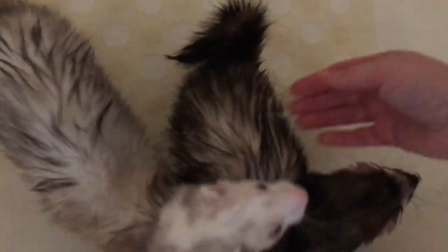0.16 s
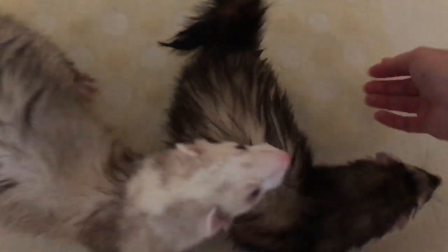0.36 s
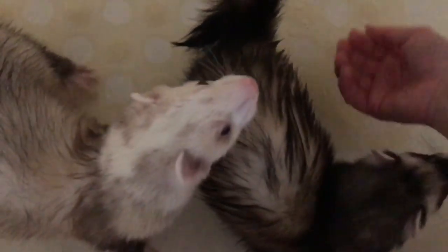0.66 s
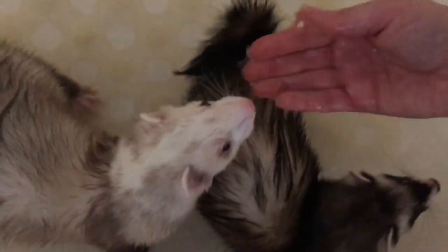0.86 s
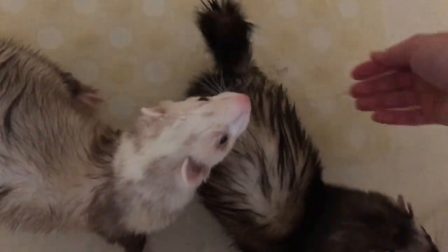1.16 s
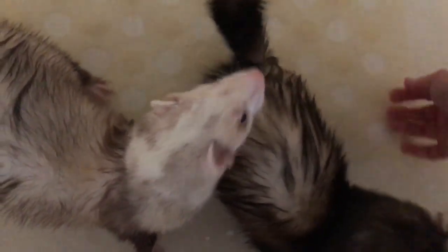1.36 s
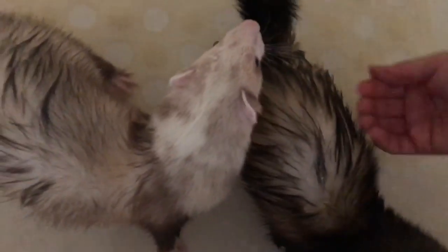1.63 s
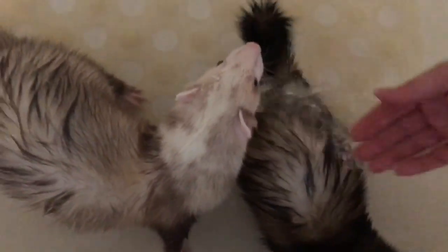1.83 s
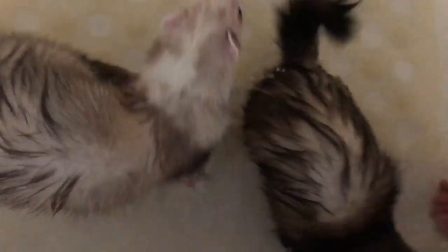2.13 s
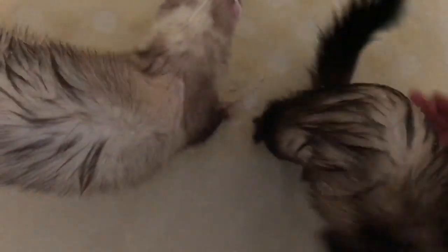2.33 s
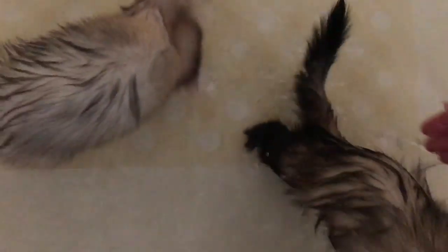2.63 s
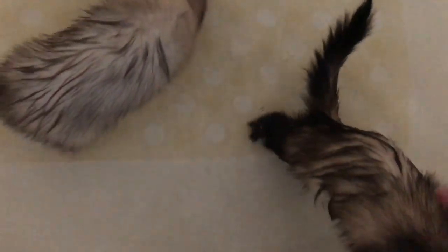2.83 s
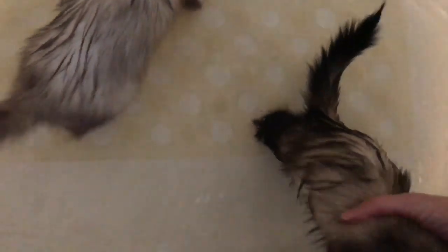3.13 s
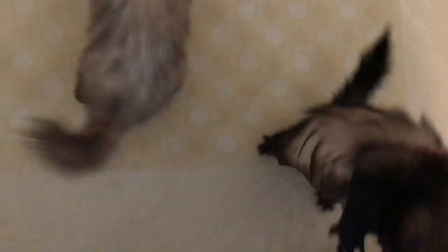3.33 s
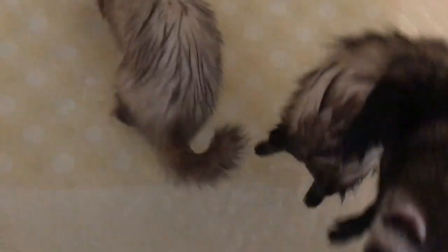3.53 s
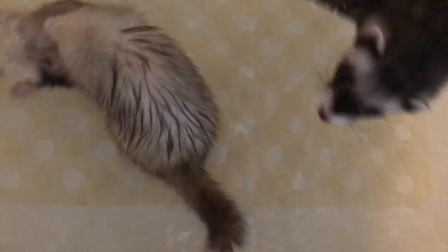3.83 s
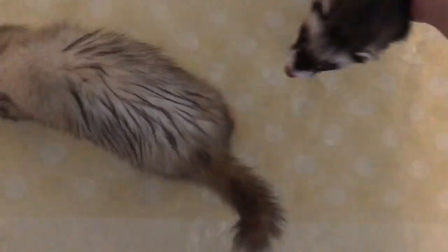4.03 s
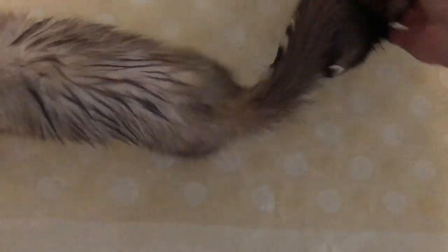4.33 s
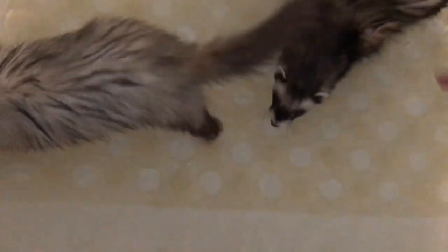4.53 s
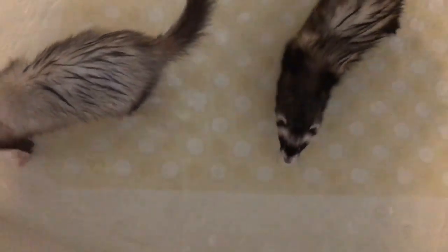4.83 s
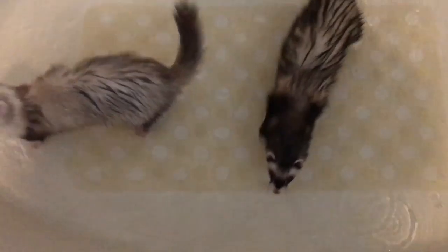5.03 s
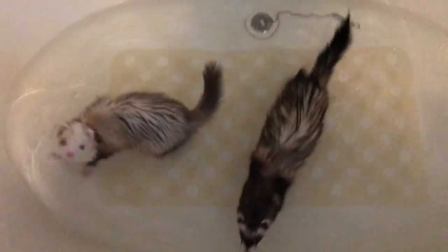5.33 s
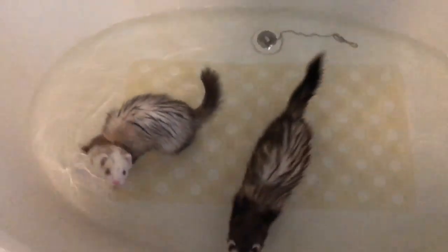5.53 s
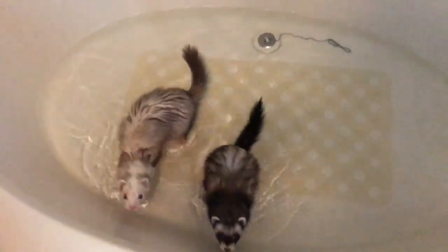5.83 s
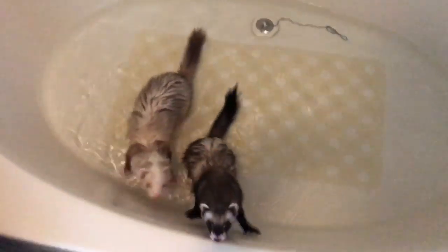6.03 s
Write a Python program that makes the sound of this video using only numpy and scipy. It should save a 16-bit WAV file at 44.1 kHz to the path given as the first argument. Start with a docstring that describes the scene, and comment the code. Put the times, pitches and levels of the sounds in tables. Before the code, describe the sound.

Two ferrets wade in shallow bathwater, with scattered plinks, small splashes and drips echoing in a tub over a faint low hum.

```python
"""Shallow bathwater splashes as two ferrets wade in it and a hand scoops water over them.
Trapped air bubbles ring at a climbing pitch, drops click on the surface and paws open gulping cavities;
each sweep stirs up a cloud of small bubbles and spray, air pockets squelch and bumps make the tub boom.
The tub adds a dense blur of echoes and its resonances, the small bathroom rings briefly,
and a low hum, rumble and faint hiss lie underneath."""
import sys
import numpy as np
from scipy import signal
from scipy.fft import rfft, irfft, next_fast_len
from scipy.io import wavfile
from scipy.ndimage import uniform_filter1d

SR = 44100
rng = np.random.default_rng(int(sys.argv[2]) if len(sys.argv) > 2 else 0)


def to_wav(sig):
    """Store sig (one row per channel, or 1-D mono) as 16-bit WAV at the path in sys.argv[1].

    Samples outside -1..1 are clipped; the rate is SR.
    """
    pcm = np.clip(np.atleast_2d(sig), -1, 1) * 32767
    pcm = np.round(pcm).astype(np.int16)
    wavfile.write(sys.argv[1], SR, pcm.T)  # frames by channels


N = 272097
TIME = np.arange(N) / SR

# Levels in these tables are relative: the source functions add their own trims.
# larger bubbles that stand out of the splashing: start_s, pitch_hz, level_db
BUBBLES = [(.045, 2180, -32.5), (.164, 4200, -34.5), (.2093, 1924, -28), (.2255, 3180, -26),
           (.227, 743, -24), (.6124, 3570, -34.5), (.7567, 5200, -28.5), (0.7928, 5540, -33.5),
           (.9083, 2180, -34), (1.0298, 1806, -30), (1.091, 2340, -36), (1.321, 5140, -36),
           (1.725, 2815, -27.5), (1.9895, 2140, -25), (2.003, 1590, -23), (2.0549, 2256, -28.5),
           (2.1365, 977, -29.5), (2.2282, 1012, -25.5), (2.3667, 3640, -29.5), (2.6535, 1200, -33),
           (2.8336, 1617, -30), (2.8447, 850, -30.5), (3.2048, 1090, -36), (3.3488, 1990, -28),
           (3.3768, 3710, -25.5), (3.405, 3050, -31.5), (3.5583, 1630, -36), (3.6381, 1080, -32),
           (3.646, 763, -37), (3.9712, 2870, -22), (4.0641, 2200, -23), (4.2152, 2350, -23.5),
           (4.2158, 905, -23.5), (4.2942, 4250, -27.5), (4.4305, 2035, -32.5), (4.4823, 3720, -33.5),
           (4.501, 1238, -24.5), (4.6523, 1070, -25.5), (4.8056, 4230, -16.5), (4.852, 932, -36.5),
           (5.1011, 816, -34.5), (5.128, 1030, -34.5), (5.4012, 977, -34), (5.482, 761, -24),
           (5.62, 2700, -19.5), (5.6246, 860, -32.5), (5.732, 1655, -20.5), (5.745, 1670, -23.5),
           (5.81, 1424, -23), (5.815, 582, -28.5), (5.9219, 777, -25), (6.1297, 1282, -36)]
# hardest drops on the surface: start_s, level_db, centre_hz, crack_level_db
DROPLETS = [(.003, -21, 6460, -26), (0.0178, -27.5, 8400, -34), (.0993, -36.5, 10700, -31),
            (.2, -30, 6100, -34), (0.225, -30.5, 6340, -32), (0.329, -34.5, 9400, -48),
            (0.3532, -33.5, 8840, -37), (0.473, -28, 3330, -34), (0.482, -26, 6440, -45),
            (.5803, -32.5, 7750, -29), (.612, -35, 4500, -40), (0.7385, -35, 4000, -45),
            (0.909, -38, 3080, -29.5), (1.03, -31.5, 9200, -49), (1.078, -25.5, 11200, -30),
            (1.1017, -30, 10960, -32), (1.1544, -43, 5400, -29), (1.3207, -32, 5470, -36),
            (1.725, -26, 7400, -43), (1.9134, -27, 4600, -34), (2.0103, -9, 3020, -26),
            (2.021, -19.5, 8300, -42), (2.041, -30, 6750, -45), (2.3423, -30, 4100, -37),
            (2.4673, -30.5, 5060, -32), (2.547, -28.5, 1800, -37), (2.5902, -23.5, 3920, -32),
            (2.7672, -26, 2620, -48), (3.114, -32.5, 5640, -34), (3.34, -26.5, 1700, -58),
            (3.3754, -25, 5500, -42), (3.387, -28.5, 5500, -50), (3.887, -22.5, 6040, -34),
            (4.052, -18, 2920, -13), (4.2152, -21.5, 4380, -49), (4.2936, -23, 5100, -30),
            (4.3086, -34, 4830, -32), (4.4161, -22, 5460, -48), (4.4173, -24, 2700, -48),
            (4.5, -27, 3440, -50), (4.5402, -36.5, 8760, -37), (4.64, -19, 2130, -43),
            (4.649, -18.5, 5100, -19), (4.8055, -30, 4730, -35), (5.478, -20.5, 2060, -45),
            (5.4812, -22.5, 7800, -22), (5.5862, -24, 3620, -31.5), (5.787, -30, 4530, -57),
            (5.8154, -15.5, 10200, -42), (6.096, -26.5, 10100, -42)]
# a paw or hand opens a cavity in the water: start_s, level_db, cavity_pitch_hz, spray_level_db
PLUNGES = [(.226, -30.5, 640, -60), (2.008, -18, 776, -47), (2.137, -27.5, 880, -51.5),
           (2.227, -27, 1180, -44.5), (2.547, -26.5, 1520, -47.5), (2.767, -27.5, 1270, -52.5),
           (2.845, -27, 860, -56), (3.205, -30, 1080, -62), (3.389, -27, 514, -68),
           (3.972, -26.5, 910, -66), (4.061, -29.5, 1150, -62), (4.215, -29, 1000, -47.5),
           (4.644, -24.5, 980, -55), (5.098, -31.5, 660, -73), (5.481, -25.5, 800, -59),
           (5.813, -19, 524, -47), (5.912, -24, 780, -49.5)]
# a body or hand sweeps through the water: start_s, length_s, churn_level_db, bubble_pitch_hz
SLOSHES = [(0, 0.12, -48.5, 2680), (0.148, 0.086, -44, 1510), (0.447, 0.089, -51.5, 2230),
           (0.714, 0.35, -61, 4000), (1.049, 0.15, -45, 3350), (1.598, 0.37, -57, 3050),
           (1.907, 0.33, -53, 3300), (2.315, 0.59, -53, 3200), (2.6, 0.13, -42, 2670),
           (3.113, 0.25, -59.5, 4000), (3.343, 0.067, -43, 1670), (3.516, .12, -45.5, 1170),
           (3.808, 0.26, -57, 2910), (3.93, 0.073, -40, 2080), (4.04, 0.16, -46.5, 2920),
           (4.386, 0.28, -53, 2580), (4.78, 0.16, -47, 2400), (5.35, 0.28, -46.5, 2160),
           (5.563, 0.39, -44.5, 1980), (5.958, .41, -48, 2920)]
# an air pocket squeezed shut sweeps upwards: start_s, length_s, from_hz, to_hz, level_db
SQUELCHES = [(1.104, .022, 2600, 3300, -39), (2.234, .029, 1250, 3050, -34)]
# bodies bump the tub: start_s, pitch_hz, level_db
BUMPS = [(2.012, 89.6, -36.5), (4.055, 90.4, -33), (4.295, 101.5, -43.5), (4.425, 101.4, -44.5)]
# colour of the spray: frequency_hz, gain_db
SPRAY_COLOUR = [(2000, 4), (3500, 2.5), (5500, 5.5), (7500, -5.5), (9000, 0), (10500, -5.5), (13000, 2),
                (16000, -3.5)]
# resonances of the tub and the air in it: frequency_hz, level_db, t60_s
TUB_MODES = [(233.8, 11, 0.46), (298.4, 14, 0.55), (443.5, 5, 0.84), (522, 10, 0.51), (694, 8, 0.42),
             (894, -2, 0.22), (1010, -12, 0.22)]
# ring of the bathroom: frequency_hz, level_db, t60_s
ROOM = [(101, -4, 0.51), (250, 0.5, 0.27), (620, -5, 0.53), (1210, -8.5, 0.44), (2640, -14, 0.56),
        (5230, -25, 0.76), (9000, -4, 0.27), (16000, -5.5, 0.1)]
# spectrum of the steady rumble: frequency_hz, level_db
RUMBLE = [(20, -34), (40, -3.5), (60, -4.5), (95, -1), (125, -22), (170, -13.5), (300, -62)]
# level of the rumble and its hum over time: time_s, level_db
DRONE = [(0, -48), (0.9, -51), (1.8, -54.5), (2.35, -46.5), (2.9, -50.5), (3.3, -52.5), (3.8, -56),
         (4.25, -47.5), (4.95, -59.5), (5.3, -51.5), (6.17, -59)]
# spectrum of the background hiss: frequency_hz, level_db
HISS = [(60, -1), (150, -4), (300, 1.5), (450, -8), (1000, -8.5), (2000, -15), (4000, -21), (8000, -26),
        (16000, -28)]
# level of the hiss over time: time_s, level_db
HISS_LEVEL = [(0, -59.5), (4.6, -58.5), (5.0, -54), (6.17, -52)]
# colour of the microphone: frequency_hz, gain_db
MICROPHONE = [(120, 0.5), (400, -1), (1000, -0.5), (3000, -.5), (4000, 0.5), (4900, -2.5), (6300, 0),
              (9500, -0.5), (15000, -2)]

HUM_HZ, HUM_DB = 58.7, -4  # the hum's level is relative to the rumble
TOP_HZ = 16100  # upper limit of the microphone
BUBBLE_CYCLES = 7.04  # a middling bubble's decay to 1/e, in cycles
RING_PER_DB, RING_PER_OCTAVE = -0.03, -0.013  # doublings of the decay: loud and tiny bubbles die sooner
CHURN_DB, CHURN_RATIO = -16, 1.45  # bubbles from a cavity: level and pitch relative to it
CHURN_LEAD_S, CHURN_S = 0.015, 0.092  # how far ahead of the plunge they start, and how long they last
THUMP_DB_PER_OCTAVE = -5.5  # smaller, higher cavities thump the tub floor less
# finer bubbles come with more spray; at this pitch spray and churn get the same level before trims
SPRAY_DB_PER_OCTAVE, SPRAY_EVEN_HZ = 9.5, 3270


def undb(db):
    """Decibels are logarithmic: convert them to an amplitude gain."""
    return 10 ** (np.asarray(db) / 20)


def unit(x):
    """Normalisation by effective value: scale to an rms of one."""
    return x / np.sqrt(np.mean(x ** 2))


def add(track, s, sound):
    """Superposition: mix a sound into the track at a time in seconds."""
    i = int(np.clip(s * SR, 0, N - 1))
    track[i:i + len(sound)] += sound[:N - i]


def colour(x, points):
    """Spectral weighting: filter by (Hz, dB) points joined on a log-frequency axis."""
    hz, db = np.transpose(points)
    size = next_fast_len(len(x) + 2048)
    f = np.maximum(np.fft.rfftfreq(size, 1 / SR), 1)
    gain = undb(np.interp(np.log(f), np.log(hz), db))
    return irfft(rfft(x, size) * gain, size)[:len(x)]


def band(x, lo_hz, hi_hz, order=2):
    """Causal band-pass filtering."""
    top = min(hi_hz, 0.47 * SR)
    bottom = min(lo_hz, top / 2 ** 0.5)
    return signal.sosfilt(signal.butter(order, [bottom, top], "band", fs=SR, output="sos"), x)


def walk(rate):
    """Slow random fluctuation: smoothed random steps, rate of them per second, with an rms of one."""
    k = int(SR / rate)
    steps = np.repeat(rng.standard_normal(N // k + 1), k)
    return unit(uniform_filter1d(steps, k)[:N])


def bubble(hz, cycles, rise):
    """Damped bubble resonance: it swells at pinch-off and rings down; a rise lifts its pitch near the surface."""
    life = max(cycles, 0.5) / hz
    age = np.arange(int(6 * life * SR)) / SR / life  # in lifetimes
    pitch = np.minimum(hz * (1 + rise * (age - 0.5)), SR / 2)
    pinch = 1 - np.exp(-(age / 0.17) ** 2)
    return pinch * np.exp(-age) * np.sin(2 * np.pi * np.cumsum(pitch) / SR)


def burst(lo_hz, hi_hz, life_s):
    """Impact noise: exponentially decaying pressure patter in one band, with a peak of one."""
    t = TIME[:int(6 * life_s * SR) + 200]
    noise = np.resize(rng.standard_normal(SR // 3), len(t))
    x = band(noise * np.exp(-t / life_s), lo_hz, hi_hz)
    return x / np.abs(x).max()


def swarm(count, order, lo_hz, hi_hz, cycles, scatter_db, rise):
    """Random superposition of small bubbles: count of them in each of order sizes."""
    out = np.zeros(N + SR)
    for hz in np.geomspace(lo_hz, hi_hz, order):
        when, strength = rng.random((count, 2)).T
        ring = bubble(hz, cycles * 2 ** rng.uniform(-1, 1), rise) * (hz / lo_hz) ** 0.5
        db = -scatter_db * np.log(np.maximum(strength, 0.03))
        samples = (when * N).astype(int)[:, None] + np.arange(len(ring))
        np.add.at(out, samples, undb(db)[:, None] * ring)
    return out[:N]


def hum(waver_db=3, drone_db=-1.5):
    """Steady tone in broadband noise: a wavering mains hum in a low rumble, with faint hiss."""
    tone = np.sin(2 * np.pi * HUM_HZ * TIME) * undb(waver_db * walk(13))
    tone = unit(tone) * undb(HUM_DB)
    rumble = unit(colour(rng.standard_normal(N), RUMBLE + [(2000, -95)]))
    hiss = unit(colour(rng.standard_normal(N), HISS))
    hiss = hiss * undb(np.interp(TIME, *np.transpose(HISS_LEVEL)))
    drone_level = np.interp(TIME, *np.transpose(DRONE)) + drone_db
    return (tone + rumble) * undb(drone_level) + hiss


def bathroom(x, room_db=-2, tub_db=-7, tub_life_s=0.035, modes_db=-3):
    """Reverberation by convolution: direct sound, dense tub echoes, tub resonances and the room's ring."""
    t = TIME[:SR // 2]
    response = np.zeros(len(t))
    response[0] = 1
    blur = band(rng.standard_normal(len(t)), 430, 18900, order=1)
    blur = blur * np.exp(-t / tub_life_s) * (1 - np.exp(-t / 0.00024))
    response += undb(tub_db) * blur / np.linalg.norm(blur)
    for hz, db, t60 in TUB_MODES:
        fade = np.exp(-np.log(1000) * t / t60)
        response += undb(db + modes_db) * 2 * np.cos(2 * np.pi * hz * t) * fade / fade.sum()
    room_hz, band_db, band_t60 = np.transpose(ROOM)
    for hz in np.geomspace(62.5, 16000, 9):  # octave bands
        db = np.interp(np.log(hz), np.log(room_hz), band_db)
        t60 = np.interp(np.log(hz), np.log(room_hz), band_t60)
        fade = np.exp(-np.log(1000) * t / t60) * (1 - np.exp(-t / 0.0012))
        noise = band(rng.standard_normal(len(t)), hz / 2 ** 0.5, hz * 2 ** 0.5)
        response += undb(db + room_db) * noise * fade / np.linalg.norm(fade)
    return signal.fftconvolve(x, response)[:N]


def booms(cycles=4):
    """Heavily damped low resonance: the water-laden tub, bumped, rings for a few slow cycles."""
    out = np.zeros(N)
    for s, hz, db in BUMPS:
        add(out, s, undb(db) * bubble(hz, cycles, rise=0))
    return out


def drips(db=-66):
    """Sparse random excitation: wet fur drips, giving faint stray bubble ticks all over the bath."""
    ticking = swarm(count=8, order=40, lo_hz=2480, hi_hz=15040, cycles=6.3, scatter_db=3, rise=0.04)
    return undb(db) * unit(ticking)


def squelches(flutter_db=4):
    """Resonance of a shrinking volume: air pockets under wet fur chirp upwards at a fluttering level."""
    out = np.zeros(N)
    for s, length, from_hz, to_hz, db in SQUELCHES:
        size = int(length * SR)
        pitch = np.linspace(from_hz, to_hz, size)
        chirp = np.sin(2 * np.pi * np.cumsum(pitch) / SR)
        add(out, s, undb(db) * signal.windows.tukey(size, 0.5) * chirp)
    return out * undb(flutter_db * walk(300))


def gulps(slap_db=-2, thump_db=-12, wash_db=-11, lag_s=0.00381):
    """Cavity collapse: it throws water aside and slaps shut; the tub floor answers a moment later."""
    out = np.zeros(N)
    for s, db, hz, _ in PLUNGES:
        low_db = THUMP_DB_PER_OCTAVE * np.log2(hz / 900)
        add(out, s + 0.00193, undb(db + slap_db) * burst(hz / 1.41, hz * 1.43, life_s=0.007))
        add(out, s + 0.0018, undb(db + wash_db) * burst(1510, 3380, life_s=0.03))
        add(out, s + lag_s, undb(db + low_db + thump_db) * burst(129, 490, life_s=0.02))
    return out


def stirrings():
    """Air entrainment by plunges and sweeps: start_s, length_s, churn_level_db, pitch_hz, spray_level_db."""
    plunges = [(s - CHURN_LEAD_S, CHURN_S, db + CHURN_DB, hz * CHURN_RATIO, spray_db)
               for s, db, hz, spray_db in PLUNGES]
    sweeps = [(s, length, db, hz, db + SPRAY_DB_PER_OCTAVE * np.log2(hz / SPRAY_EVEN_HZ))
              for s, length, db, hz in SLOSHES]
    return plunges + sweeps


def sloshes(churn_db=-3, spray_db=1.5, width=1.63, onset=0.2, fall=1.65, flicker_db=3):
    """Collective bubble noise: each push stirs up bubbles and crackling spray that swell and die away."""
    churn = swarm(count=30, order=100, lo_hz=387.8, hi_hz=6310, cycles=5.26, scatter_db=2, rise=0.079)
    fizz = swarm(count=20, order=100, lo_hz=3243, hi_hz=11760, cycles=6.8, scatter_db=3.5, rise=0.059)
    crackle = swarm(count=16, order=60, lo_hz=7060, hi_hz=16300, cycles=0.8, scatter_db=1, rise=0)
    # films of water burst in clumps
    spray = colour(unit(fizz) + unit(crackle), SPRAY_COLOUR) * undb(flicker_db * walk(90))
    out = np.zeros(N)
    for s, length, low_db, hz, high_db in stirrings():
        start, size = int(max(s, 0) * SR), int(length * SR)
        bubbles = unit(band(churn[start:start + size], hz / width, hz * width))
        mist = unit(spray[start:start + size])
        progress = np.linspace(0, 1, len(mist))
        swell = np.interp(progress, [0, onset, 1], [0, 1, 0]) ** (1 / fall)
        add(out, s, swell * (undb(low_db + churn_db) * bubbles + undb(high_db + spray_db) * mist))
    return out


def ticks(gain_db=1, life_s=0.0013, near_db=-25, nearness=0.099):
    """Impact of drops: a click of about a millisecond and a treble crack; the hardest are nearest and driest."""
    direct, to_walls = np.zeros(N), np.zeros(N)
    for s, db, hz, crack_db in DROPLETS:
        click = undb(db + gain_db) * burst(hz / 1.406, hz * 1.263, life_s)
        click = click + undb(crack_db) * burst(11500, 15050, life_s)
        wall_share = undb(-nearness * max(db - near_db, 0))
        add(direct, s, (1 - wall_share) * click)
        add(to_walls, s, wall_share * click)
    return direct, to_walls


def plinks(rise=0.016, closeness_db=3, gain_db=-1, snap_db=-20, echo_db=-12,
           farthest_s=0.02, near_db=-25, nearness=0.075):
    """Resonance of larger bubbles, direct and towards the walls; the strongest are nearest and driest."""
    direct, to_walls = np.zeros(N), np.zeros(N)
    for s, hz, db in BUBBLES:
        doublings = RING_PER_DB * (db + 31.5) + RING_PER_OCTAVE * np.log2(hz / 2000)
        ring = bubble(hz, BUBBLE_CYCLES * 2 ** doublings, rise)
        ring = undb(db + gain_db) * ring / np.abs(ring).max()
        wall_share = undb(-nearness * max(db - near_db, 0))
        add(direct, s, undb(closeness_db) * (1 - wall_share) * ring)
        add(to_walls, s, wall_share * ring)
        add(to_walls, s, wall_share * undb(db + snap_db) * burst(1300, 10200, life_s=0.013))
        # each bubble sits somewhere else in the tub, so its first echoes come at other delays
        for delay in rng.uniform(0.004, farthest_s, size=2):
            add(to_walls, s + delay, wall_share * undb(echo_db) * ring)
    return direct, to_walls


def scene():
    """Superposition of sources: the water sounds in the reverberant tub, over booms and hum."""
    near_bubbles, bubbles = plinks()
    near_drops, drops = ticks()
    water = bubbles + drops + squelches() + gulps() + sloshes() + drips()
    return (near_bubbles + near_drops + bathroom(water) + booms() + hum())[None]


def record(dry):
    """Frequency response of the microphone: a slight colour and a steep cut of the top."""
    coloured = colour(dry[0], MICROPHONE)
    return signal.sosfilt(signal.ellip(8, 0.2, 70, TOP_HZ, fs=SR, output="sos"), coloured)[None]


dry = scene()
out = record(dry)
to_wav(out)
```